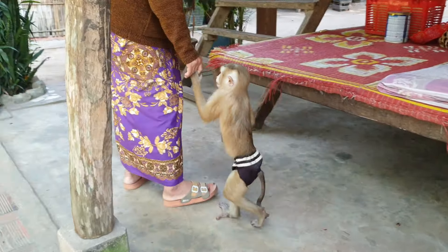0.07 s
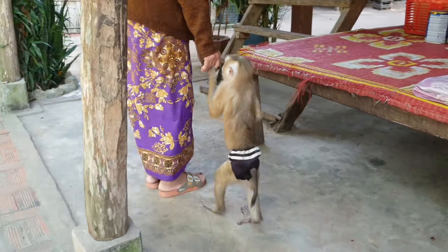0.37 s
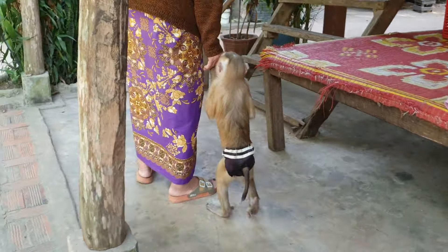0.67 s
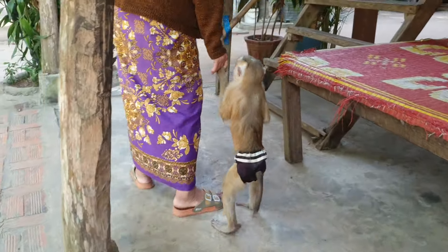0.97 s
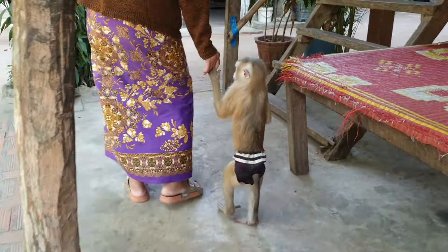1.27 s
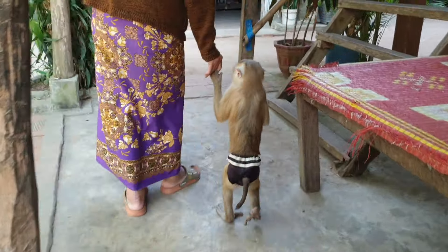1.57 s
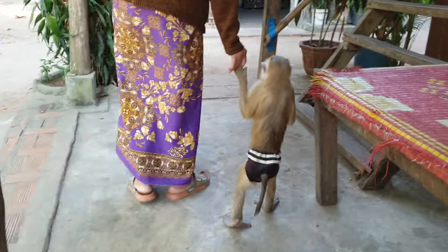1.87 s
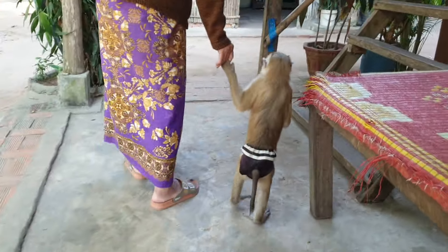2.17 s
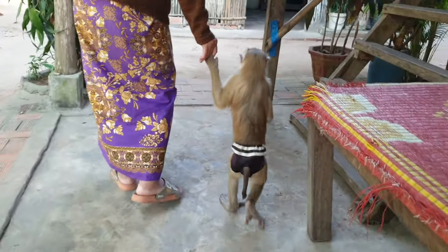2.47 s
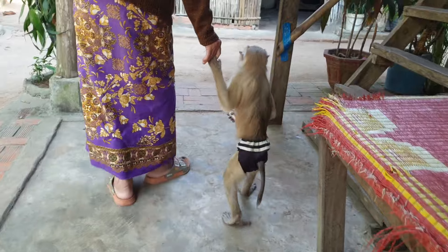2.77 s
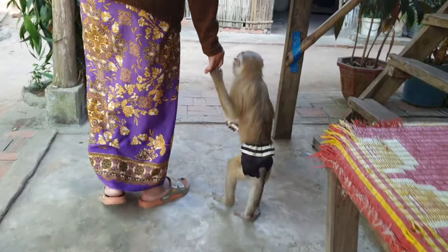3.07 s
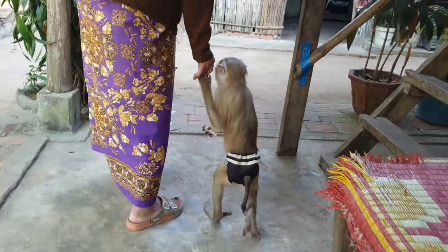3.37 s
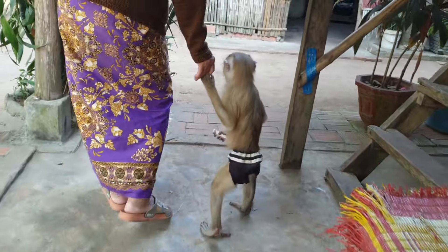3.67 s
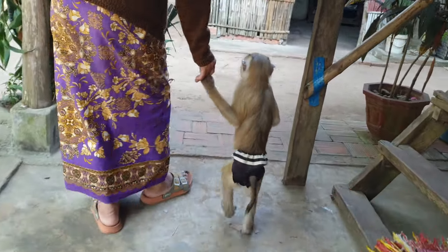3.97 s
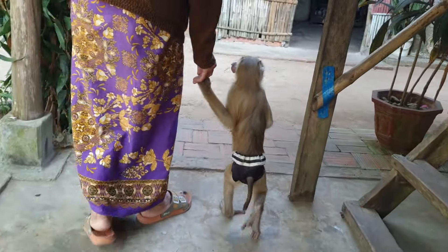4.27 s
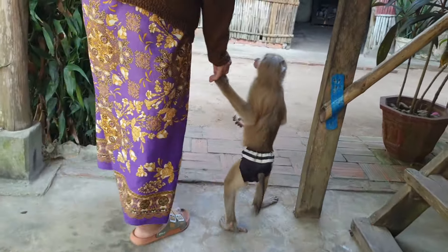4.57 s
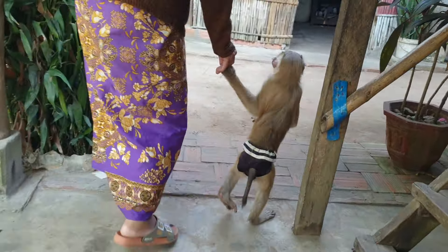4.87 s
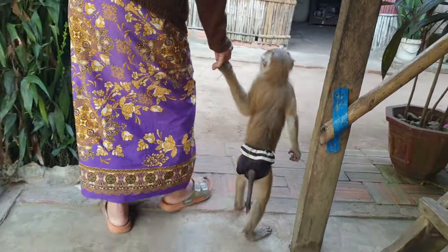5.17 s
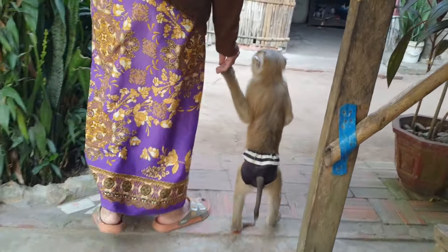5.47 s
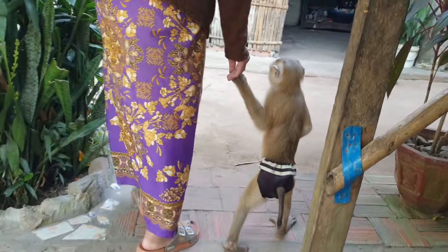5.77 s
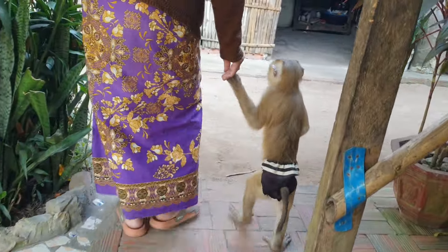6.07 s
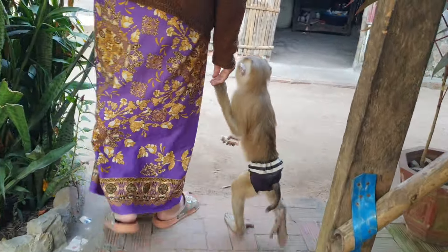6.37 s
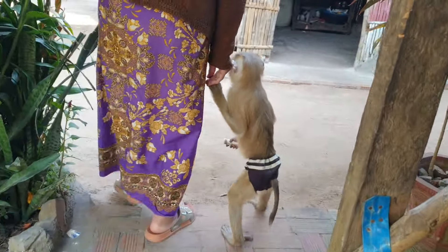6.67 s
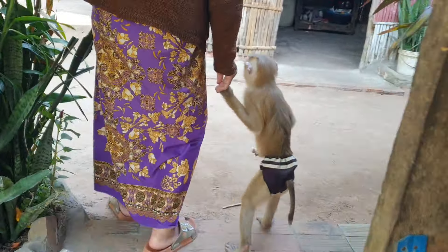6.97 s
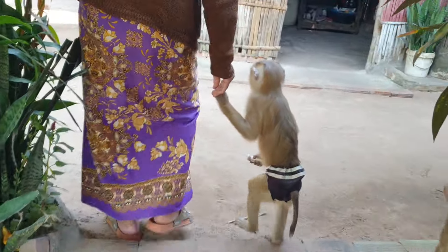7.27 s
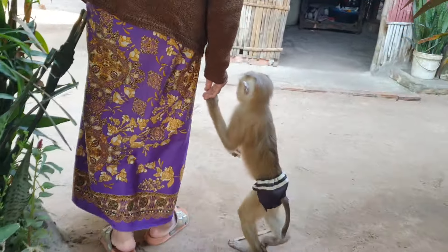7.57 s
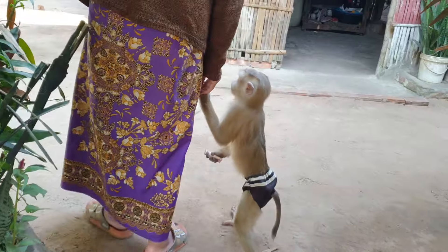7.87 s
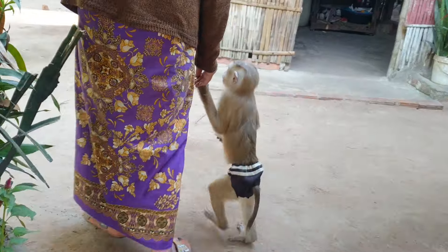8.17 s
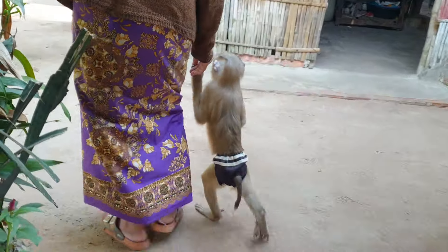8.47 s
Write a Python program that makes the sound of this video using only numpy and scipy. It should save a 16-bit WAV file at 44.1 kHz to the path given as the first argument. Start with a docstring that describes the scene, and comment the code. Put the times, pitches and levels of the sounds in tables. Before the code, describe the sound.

Slow, shuffling sandal steps cross a gritty concrete yard, close by, with a short ring from walls and a porch roof. Soles roll and drag unevenly over crackling sand, with stronger scrapes at about 0.3, 1.4, 2.7, 3.3, 4.6, 5.2 and 6.2 seconds. Single grains snap sharply, most often between 1 and 4 seconds. Soft, low footfalls land around 0.3, 3.1, 5.8 and 7.7 seconds. A skirt brushes faintly several times from about 3 to 7.3 seconds. The steps become somewhat lighter after 6.5 seconds.

Throughout, a distant engine chugs in a quick, low pulse within a steady rumble, swelling slightly around 6.5 seconds. Faint outdoor air rises a little toward the end. Two very faint, thin, slightly falling calls sound far away at about 7.9 and 8.3 seconds, the second higher and shorter.

```python
"""A gritty concrete yard. Someone in sandals shuffles slowly, leading a small monkey by the hand.
Soles drag, roll and land; sand crackles under them, single grains snap, a skirt brushes.
Far off, a slow one-cylinder engine chugs under low rumble and faint outdoor air.
Two thin, distant calls sound near the end. Walls and porch roof add a short ring."""
import sys
import numpy as np
from scipy import signal
from scipy.fft import rfft, irfft, next_fast_len
from scipy.io import wavfile
from scipy.ndimage import uniform_filter1d, map_coordinates

SR = 44100
rng = np.random.default_rng(int(sys.argv[2]) if len(sys.argv) > 2 else 0)


def generate_wav(signal):
    """Clip the signal to [-1, 1] and save it as 16-bit WAV at the path in sys.argv[1]."""
    frames = np.transpose(np.atleast_2d(signal))
    scaled = np.clip(frames, -1, 1) * 32767
    pcm = np.round(scaled).astype(np.int16)
    wavfile.write(sys.argv[1], SR, pcm)


N = 375027

# background spectra: f/Hz, level/dB
AIR_SPECTRUM = [(200, 16.5), (400, 3.5), (700, -0.5), (1200, -2.5), (2800, -10), (4200, -28), (8000, -18),
                (11000, -3), (16000, -19)]
RUMBLE_SPECTRUM = [(12, -34), (20, -33), (50, -1.5), (75, -1), (143, -4), (303, -26), (499, -30.5),
                   (600, -40), (780, -60), (1320, -120)]
EXHAUST_SPECTRUM = [(25, -22), (45, -7), (66, 3.5), (85, 1.5), (110, -5), (145, -8), (175, -15), (250, -22),
                    (350, -37), (600, -52), (1200, -70)]
# air, louder beyond the roof edge: t/s, level/dB
AIR_LEVEL = [(0, -66), (6.5, -67), (8.5, -59.5)]
# engine and rumble, common level: t/s, level/dB
LOW_LEVEL = [(0, -48.5), (.8, -52), (1.4, -47.5), (2.2, -50), (3, -47.5), (5.4, -46.5), (6.5, -43),
             (7.1, -48.5), (7.8, -47.5), (8.5, -45.5)]
# engine firing rate: t/s, f/Hz
FIRING_RATE = [(.7, 15.3), (1.3, 14.55), (3.1, 14.3), (3.8, 14.84), (5.5, 16.1), (6.3, 15.8), (8.5, 15.9)]
# distant calls: t/s, length/s, start f/Hz, end f/Hz, level/dB
CALLS = [(7.87, .23, 925, 885, -73), (8.3, .14, 1530, 1450, -74)]
# ring of yard and porch roof: f/Hz, T60/s
YARD_T60 = [(300, 0.15), (2500, 0.29), (6000, 0.22), (14000, 0.13)]
# skirt brushes: centre t/s, length/s, level/dB, resonance f/Hz
SKIRT_BRUSHES = [(3.226, .14, -67, 2550), (3.797, .12, -62.5, 2920), (4.363, 0.13, -63, 2940),
                 (4.886, 0.2, -68.5, 2250), (5.599, 0.13, -66.5, 2720), (5.72, .053, -69, 2780),
                 (6.394, 0.18, -70, 2970), (7.09, 0.17, -65.5, 2750), (7.307, 0.044, -66, 2640)]
# foot takes the weight: t/s, level/dB, f/Hz
LANDINGS = [(0.323, -47.5, 173.4), (3.089, -49, 142.2), (5.216, -66, 384.6), (5.758, -45.5, 110.4),
            (6.209, -56.5, 252.6), (7.43, -59, 262), (7.679, -46, 113)]
# single grains snap: t/s, level/dB
GRAIN_SNAPS = [(.841, -32), (1.103, -28), (1.2201, -31), (1.6347, -27), (1.9709, -35), (2.3989, -32),
               (2.5207, -26), (2.9916, -37), (3.0824, -29), (3.1901, -31), (3.3049, -29), (4.122, -34),
               (4.145, -31), (4.5765, -41), (6.1365, -38), (7.4794, -34), (8.3848, -36), (8.4223, -39)]
# spectra of sand, loaded sole, barely touching sole: f/Hz, level/dB
SAND_SPECTRUM = [(600, -16), (1500, -14), (2900, -5.5), (4000, -10.5), (6200, -5.5), (7600, -8.5),
                 (9300, -0.5), (11500, 2), (13500, 0), (16000, -4)]
RASP_SPECTRUM = [(200, -23), (400, -13.5), (620, -21), (800, -10), (1250, -5.5), (1900, 1), (2400, -3),
                 (3100, -2), (3900, -8), (6200, -9.5), (8000, -25), (16000, -21)]
RUB_SPECTRUM = [(400, -31), (850, -15.5), (1300, -8), (1900, -4.5), (2950, -2), (3900, -9), (6200, -11),
                (16000, -52)]
# loose sand, never at rest under the four feet: t/s, level/dB
LOOSE_SAND_LEVEL = [(0, -66), (.9, -61.5), (1.35, -72), (3, -64), (4.2, -66.5), (5.1, -71.5), (6.1, -77),
                    (6.6, -69), (6.85, -75), (7.9, -62.5), (8.5, -69.5)]
# light rolls or turns, forward drags: t/s, length/s, sand level/dB, rasp level/dB
FOOT_ROLLS = [(0, 0.13, -51.5, -53.5), (.456, 0.086, -50, -54), (.655, .1, -62.5, -65),
              (.75, 0.12, -50, -64), (1.028, 0.11, -49.5, -60), (1.137, 0.062, -45, -54),
              (1.57, 0.095, -51, -57), (1.74, 0.087, -50.5, -58), (1.84, .14, -52, -81),
              (2.0, 0.15, -47.5, -52.5), (2.345, 0.18, -47.5, -57.5), (2.89, 0.12, -62.5, -75),
              (3.068, 0.047, -47.5, -54), (3.13, .13, -61, -64), (3.535, 0.16, -57, -68.5),
              (3.72, .15, -55.5, -69), (4.08, 0.12, -58.5, -82), (4.3, 0.047, -54.5, -84),
              (4.73, 0.18, -56, -64), (5.398, .07, -53, -63.5), (5.5, 0.22, -59.5, -67),
              (5.858, 0.05, -54.5, -73), (6.124, 0.05, -53, -64), (6.26, 0.18, -53.5, -62),
              (6.88, .125, -56, -69.5), (7.02, 0.17, -56, -60.5), (7.23, 0.074, -63.5, -76),
              (7.48, .15, -70, -98), (7.7, 0.11, -60, -61.5), (7.9, 0.11, -57.5, -69),
              (8.31, 0.067, -60.5, -70), (8.412, .05, -52, -65.5)]
SANDAL_DRAGS = [(.256, 0.073, -44, -41.5), (1.403, 0.14, -45, -46), (2.706, 0.1, -41.5, -43),
                (3.3, 0.063, -39, -43), (3.939, 0.094, -45.5, -51.5), (4.574, 0.1, -42.5, -51),
                (5.2, 0.038, -40, -45.5), (5.745, 0.022, -43, -51.5), (6.188, 0.046, -44, -46.5),
                (7.424, 0.033, -58.5, -59.5), (7.675, 0.022, -46, -57)]
# diffuse sound at the two mics: f/Hz, correlation
MIC_CORRELATION = [(40, 1), (150, 1), (300, 0.65), (700, 0.59), (1500, 0), (4000, 0.21)]
# mic colour, left minus right: f/Hz, level/dB
MIC_TILT = [(60, -2.9), (300, -2), (800, -1), (1800, -2.5), (2800, -4.5), (4200, 1), (6400, 3.5), (9500, 0),
            (12000, 3), (15000, 4.5)]


def gain(db):
    """dB to amplitude."""
    return 10 ** (np.asarray(db) / 20)


def unit_rms(x):
    """Scale to rms 1."""
    return x / np.sqrt(np.mean(x ** 2) + 1e-20)


def at_hz(table, hz):
    """Interpolate on a log-frequency axis."""
    table_hz, value = np.transpose(table)
    return np.interp(np.log(hz + 1), np.log(table_hz + 1), value)


def curve(table):
    """Timed table to one value per sample."""
    return np.interp(np.arange(N) / SR, *np.transpose(table))


def add(mix, start_s, sound):
    """Mix in at start_s."""
    part = mix[max(round(start_s * SR), 0):][:len(sound)]
    part += sound[:len(part)]


def colour(x, spectrum):
    """Filter by a spectrum."""
    size = next_fast_len(N + SR // 10)
    response = gain(at_hz(spectrum, np.fft.rfftfreq(size, 1 / SR)))
    return irfft(rfft(x, size) * response, size)[..., :N]


def drift(rate_hz):
    """Smooth random curve, rms 1."""
    knots = rng.standard_normal(N // 20)
    return unit_rms(np.interp(np.arange(N) * rate_hz / SR, np.arange(len(knots)), knots))


def crossfade(a, b, share):
    """Equal power, a to b."""
    angle = np.clip(share, 0, 1) * np.pi / 2
    return np.cos(angle) * a + np.sin(angle) * b


def diffuse(spectrum):
    """Noise from all around: alike at both mics in the bass, nearly unrelated in the treble."""
    size = next_fast_len(N)
    left, other = rfft(rng.standard_normal((2, size)))
    correlation = np.clip(at_hz(MIC_CORRELATION, np.fft.rfftfreq(size, 1 / SR)), -1, 1)
    right = correlation * left + np.sqrt(1 - correlation ** 2) * other
    return unit_rms(colour(irfft([left, right], size)[:, :N], spectrum))


def air():
    """Faint, slightly wavering outdoor noise."""
    return diffuse(AIR_SPECTRUM) * gain(curve(AIR_LEVEL) + 0.6 * drift(rate_hz=2.83))


def engine():
    """One uneven exhaust puff per firing, smeared by echoes, with a shapeless rumble."""
    cycles = np.cumsum(curve(FIRING_RATE) * (1 + 0.0039 * drift(rate_hz=5))) / SR
    puffs = np.diff(np.floor(cycles), prepend=0) * gain(2 * drift(rate_hz=16))
    t = np.arange(SR // 3) / SR
    echoes = rng.standard_normal((5, len(t))) * np.exp(-t / .08)
    paths = signal.fftconvolve(puffs[None], echoes, axes=1)[:, :N]
    arriving = sum(path * drift(rate_hz=.9) for path in paths)  # mix shifts as the listener walks
    chug = unit_rms(colour(arriving, EXHAUST_SPECTRUM))
    chug /= np.sqrt(uniform_filter1d(chug ** 2, SR // 2) + 1e-6)  # levelled over 0.5 s
    return gain(curve(LOW_LEVEL)) * (gain(-2.2) * chug + gain(-4.5) * diffuse(RUMBLE_SPECTRUM))


def bass_phase_offset(pair, lag_rad=0.55):
    """The right mic lags in phase, slightly widening the bass."""
    right = signal.hilbert(pair[1], next_fast_len(N))[:N] * np.exp(-1j * lag_rad)
    return np.array([pair[0], right.real])


def far_calls():
    """Faint, slightly falling tones, blurred by distance."""
    out, waver = np.zeros(N), drift(rate_hz=155.9)
    for start_s, length_s, start_hz, end_hz, db in CALLS:
        hz = np.linspace(start_hz, end_hz, int(length_s * SR))
        hz *= 1 + 0.021 * waver[:len(hz)]
        tone = np.sin(2 * np.pi * np.cumsum(hz) / SR)
        add(out, start_s, gain(db) * signal.windows.tukey(len(hz), .7) * tone)
    return out


def yard(x):
    """Diffuse tail from walls and roof, longest in the midrange."""
    hz, t, noise = signal.stft(rng.standard_normal((2, SR // 2)), SR, nperseg=256)
    envelope = gain(-60 * t / at_hz(YARD_T60, hz)[:, None]) * (1 - np.exp(-t / 0.0057))
    tail = signal.istft(noise * envelope, SR, nperseg=256)[1]
    return signal.fftconvolve(x[None], tail / np.linalg.norm(tail[0]), axes=1)[:, :N]


def skirt():
    """Sliding cloth: soft swells of hiss with a broad resonance."""
    out = np.zeros((2, N))
    for centre_s, length_s, db, hz in SKIRT_BRUSHES:
        t = np.arange(int(length_s * SR)) / SR
        rub = signal.lfilter(*signal.iirpeak(hz, Q=7, fs=SR), rng.standard_normal((2, len(t))))
        hiss = signal.lfilter(*signal.iirpeak(5800, Q=1.8, fs=SR), rng.standard_normal((2, len(t))))
        swell = gain(db) * np.sin(np.pi * t / length_s)
        for side, cloth in zip(out, unit_rms(rub) + gain(-3.5) * unit_rms(hiss)):
            add(side, centre_s - length_s / 2, swell * cloth)
    return out


def thuds(rise_s=0.017):
    """A soft sole lands: a short, low push."""
    out, t = np.zeros(N), np.arange(SR // 5) / SR
    push = t / rise_s * np.exp(1 - t / rise_s)
    for start_s, db, hz in LANDINGS:
        add(out, start_s, gain(db) * push * np.sin(2 * np.pi * hz * t))
    return out


def grains(per_s, spread_db):
    """Clicks of random time, sign and size."""
    size = gain(spread_db * np.minimum(rng.exponential(1, N), 3.3))
    return unit_rms(size * rng.choice([-1, 1], N) * (rng.random(N) < per_s / SR))


def scatter(x, fade_s, tail_db, lag_samples=4):
    """Each click comes slightly earlier on the left, with a brief noisy tail, different per channel."""
    pole = np.exp(-1 / (fade_s * SR))
    power = signal.lfilter([1 - pole], [1, -pole], x ** 2 + 1e-20)
    tail = np.sqrt(abs(power)) * rng.standard_normal((2, N))
    direct = np.array([x, np.pad(x, (lag_samples, 0))[:N]])
    return (direct + gain(tail_db) * tail) / np.hypot(1, gain(tail_db))


def snaps(decay_s=.0003):
    """Large grains crack, each in under a millisecond."""
    out, t = np.zeros(N), np.arange(SR // 200) / SR
    for start_s, db in GRAIN_SNAPS:
        crack = rng.standard_normal(len(t)) * np.exp(-t / decay_s)
        add(out, start_s, gain(db) * crack)
    return colour(scatter(out, fade_s=.0004, tail_db=-1.5), SAND_SPECTRUM)


def sole_gap(x, width_hz, hold_s, depth_db):
    """Narrow resonances under the sole, shifting as the foot moves."""
    spectra = signal.stft(x, nperseg=1024, noverlap=768)[2]
    frame, line = np.meshgrid(np.arange(spectra.shape[2]), np.arange(spectra.shape[1]))
    position = [line * SR / 1024 / width_hz, frame * 256 / SR / hold_s]
    peaks = unit_rms(map_coordinates(rng.standard_normal((256, 256)), position, order=1, mode="wrap"))
    return unit_rms(signal.istft(spectra * gain(depth_db * peaks), nperseg=1024, noverlap=768)[1][:, :N])


def strokes(table, rise_share, fade_db_per_s):
    """Sand and rasp power: each stroke swells, holds, dies away as the foot stops."""
    power = np.zeros((2, N))
    for start_s, length_s, sand_db, rasp_db in table:
        t = np.arange(int((length_s + .5) * SR)) / SR
        rise_s = rise_share * length_s * np.array([[1], [1.26]])  # rasp swells more slowly
        swell = np.sin(np.pi / 2 * np.minimum(t / rise_s, 1))
        fade_db = fade_db_per_s * np.maximum(t - length_s, 0)
        envelopes = swell * gain(np.array([[sand_db], [rasp_db]]) - fade_db)
        for total, envelope in zip(power, envelopes):
            add(total, start_s, envelope ** 2)
    return power


def footwork_db(idle_rub_db=-80):
    """Sand and rasp levels: drags and rolls over a floor of loose sand and faint rub."""
    floor = gain([curve(LOOSE_SAND_LEVEL), np.full(N, idle_rub_db)]) ** 2
    drags = strokes(SANDAL_DRAGS, rise_share=0.76, fade_db_per_s=253)
    rolls = strokes(FOOT_ROLLS, rise_share=0.59, fade_db_per_s=201)
    return 10 * np.log10(floor + drags + rolls)


def soles():
    """Sand breaks in clumps: crackle and rub at a light touch, dense hiss and deeper rasp under load."""
    sand_db, rasp_db = footwork_db()
    load = np.interp(rasp_db, [-64, -42], [0, 1])
    clumps = drift(rate_hz=110) * (1 - .45 * load)
    sparse = grains(per_s=400, spread_db=6)
    dense = grains(per_s=14000, spread_db=-0.8)
    crackle = scatter(crossfade(sparse, dense, 0.56 + 0.64 * load), fade_s=0.00042, tail_db=11)
    sand = unit_rms(colour(crackle, SAND_SPECTRUM) * gain(1.7 * clumps))
    slips = scatter(grains(per_s=3000, spread_db=2.2), fade_s=.003, tail_db=2.5) * gain(2.1 * clumps)
    slips = sole_gap(slips, width_hz=130.1, hold_s=.11, depth_db=2.1)
    rasp = load * unit_rms(colour(slips, RASP_SPECTRUM))
    rub = (1 - load) * unit_rms(colour(slips, RUB_SPECTRUM))
    return sand * gain(sand_db) + (rasp + rub) * gain(rasp_db)


def scene():
    """Air, engine and calls far off; steps close by."""
    steps = soles() + skirt() + snaps() + thuds()
    calls = far_calls()
    ring_input = gain(-11.0) * steps[0] + gain(0.5) * calls
    return air() + yard(ring_input) + bass_phase_offset(engine()) + calls + steps


def record(dry, cutoff_hz=15950):
    """Colour of each mic, then the band limit."""
    sides = [colour(x, [(hz, sign * db / 2) for hz, db in MIC_TILT]) for x, sign in zip(dry, (1, -1))]
    lowpass = signal.firwin(511, cutoff_hz, window=("kaiser", 9), fs=SR)
    return signal.oaconvolve(np.array(sides), lowpass[None], "same")


dry = scene()
out = record(dry)
generate_wav(out)
```